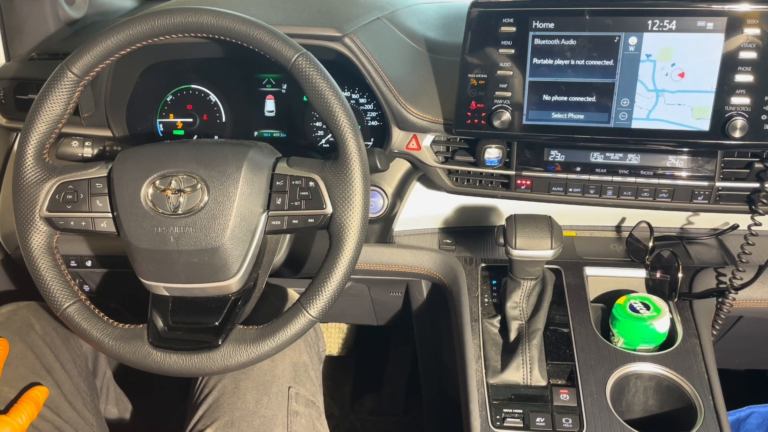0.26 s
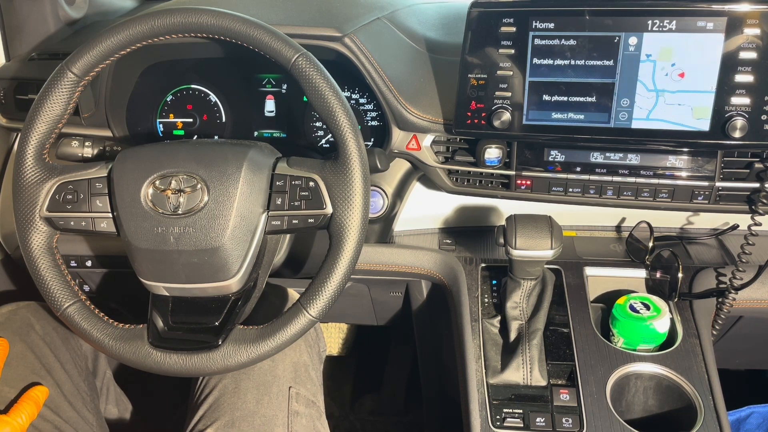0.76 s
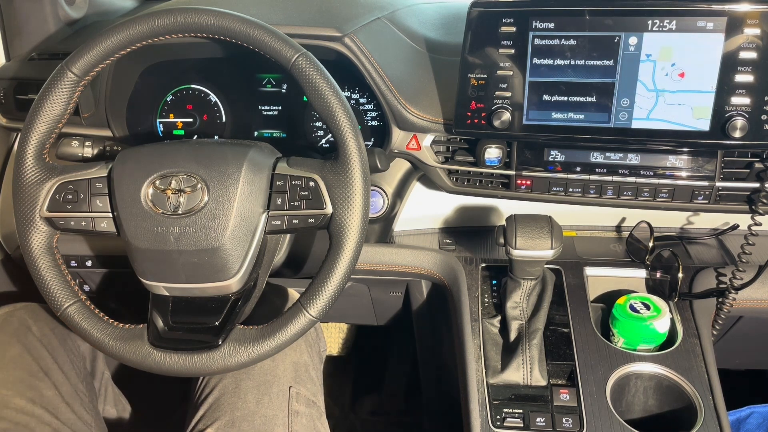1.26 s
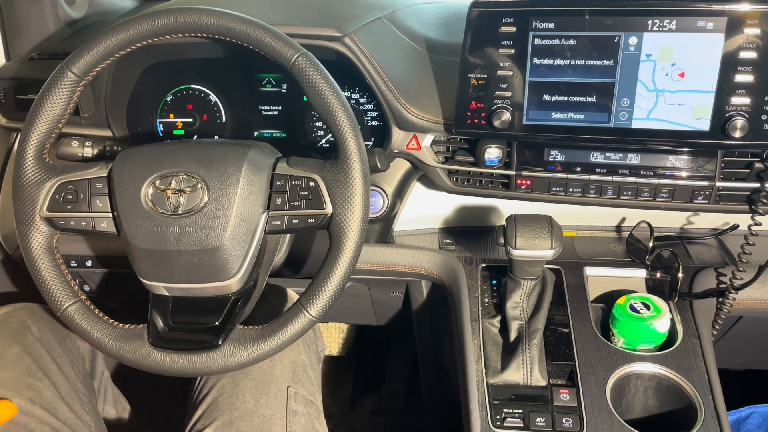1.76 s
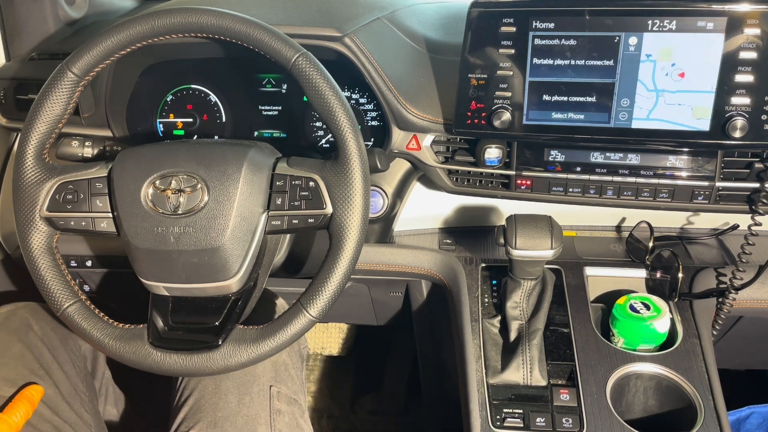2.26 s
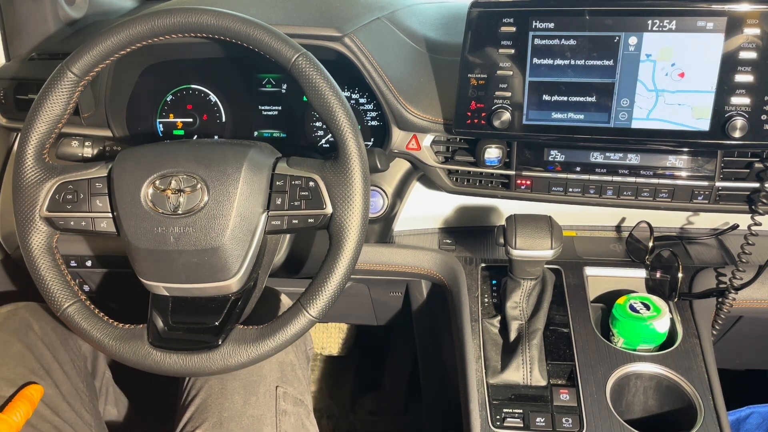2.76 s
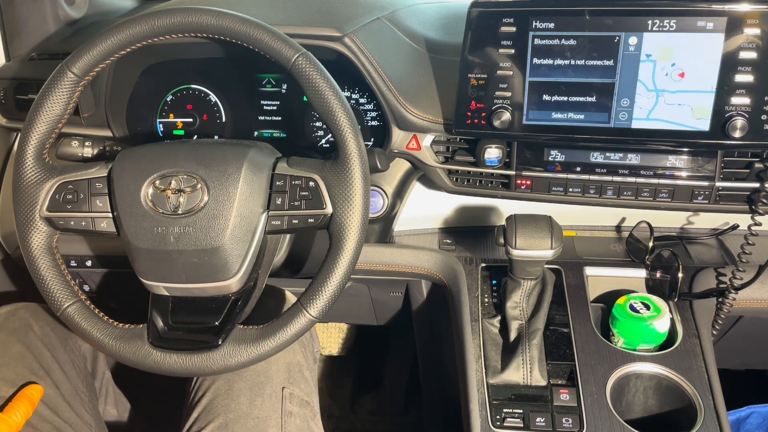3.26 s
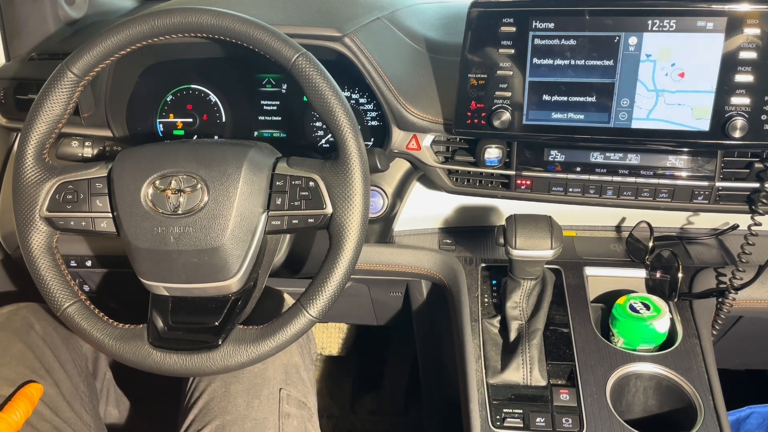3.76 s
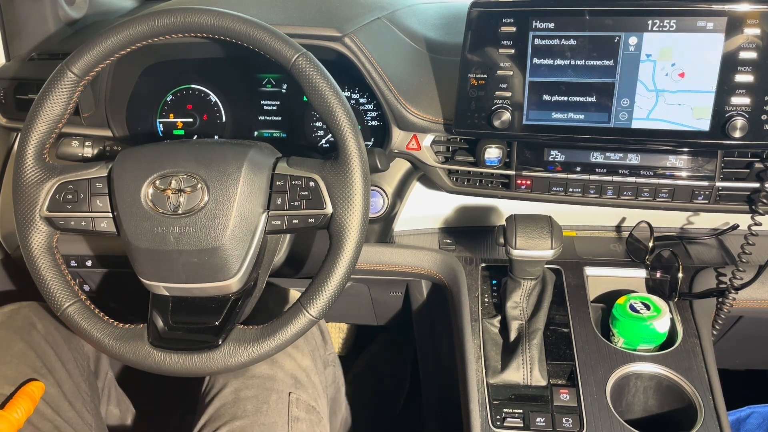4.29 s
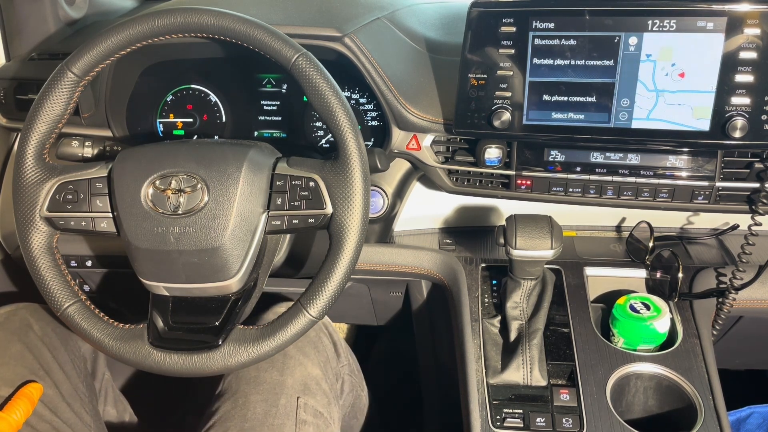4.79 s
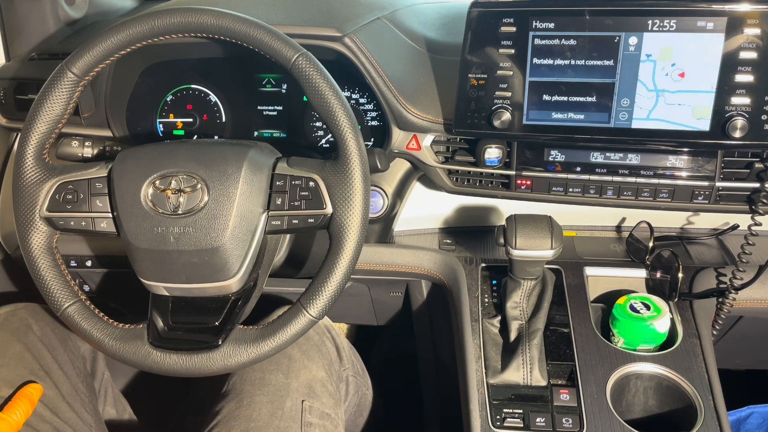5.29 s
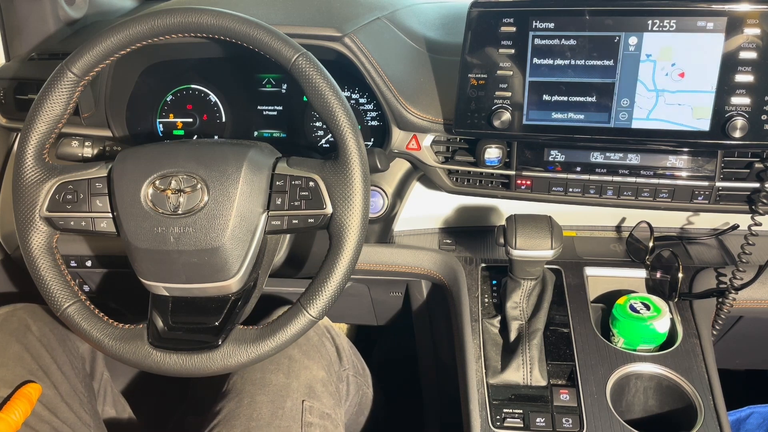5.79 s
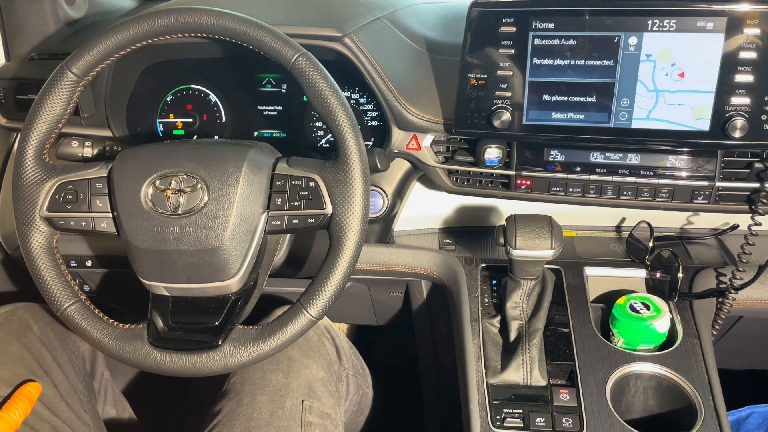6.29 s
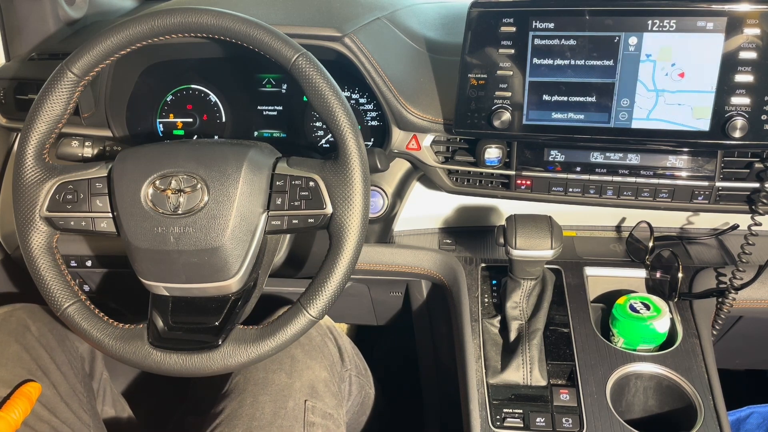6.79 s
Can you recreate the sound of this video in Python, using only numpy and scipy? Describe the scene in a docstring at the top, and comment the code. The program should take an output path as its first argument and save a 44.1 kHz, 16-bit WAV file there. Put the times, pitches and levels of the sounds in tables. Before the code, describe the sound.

Inside a parked car, a fast-idling engine hums unsteadily under blower hiss, then revs climb into a booming, roaring cabin drone.

```python
"""Inside a parked car: a four-cylinder engine idles fast, then is revved up until the cabin booms.
Engine and electric compressor are sums of shaft orders shaped by resonances; the compressor slows,
speeds up and settles. Blower hiss, floor rumble and engine-bay roar are filtered noise, as are
a brief high fizz and two soft footwell bumps. Two close microphone ports hear bass alike, treble apart."""
import sys
import numpy as np
from scipy import signal
from scipy.fft import rfft, irfft, next_fast_len
from scipy.io import wavfile
from scipy.ndimage import uniform_filter1d, map_coordinates

SR = 44100
rng = np.random.default_rng(int(sys.argv[2]) if len(sys.argv) > 2 else 0)


def wrap_up_sound(samples):
    """Save the sound to the file named by the first command line argument, as 16-bit audio."""
    columns = np.atleast_2d(samples).T
    # keep every value between -1 and 1, then stretch to whole-number steps
    tamed = np.clip(columns, -1, 1)
    steps = np.round(tamed * 32767).astype(np.int16)
    wavfile.write(sys.argv[1], SR, steps)


def decibels_to_gain(level_db):
    """Convert a level in decibels to a linear amplitude gain (20 dB per decade)."""
    exponent = np.asarray(level_db, float) / 20
    return 10 ** exponent


N = 310464

# engine firing rate, an unsteady idle and then a climb: (time [s], rate [Hz])
FIRING = [(0, 43.05), (.25, 43.38), (.5, 43.1), (.7, 43.1), (.82, 43.65), (1.2, 43.5), (1.4, 43.4),
          (1.56, 43.62), (1.75, 43.33), (2.08, 43.0), (2.2, 43.33), (2.55, 43.65), (2.75, 43.58),
          (3.08, 43.88), (3.2, 43.76), (3.38, 43.22), (3.8, 43.52), (4.0, 43.38), (4.25, 43.55),
          (4.45, 42.88), (4.6, 43.28), (4.9, 43.22), (5.0, 43.43), (5.32, 43.03), (5.42, 43.6), (5.6, 47.3),
          (5.7, 50.7), (5.9, 56.1), (6.0, 59.2), (6.1, 61.9), (6.3, 66.2), (6.5, 69.9), (6.7, 72.4),
          (7.04, 75.2)]
# between the ports: (frequency [Hz], noise side over mid [dB], likeness of side and mid [0-1],
# lead of side [rad])
PORTS = [(30, -15, 0.7, 2.5), (150, -7, 0.2, 4.5), (207, -9, 0.1, 1), (300, -2.5, 0.46, 1),
         (570, 2, 0.56, 0.4), (716, 4, 1, 0.67), (1300, 2, 0.28, 0.5), (1760, 3, 0.4, -1.5),
         (2210, -5, 0.3, 1), (4900, -2, 0.44, 0), (6540, -4.5, 0.15, -1.5), (8340, 5.5, 0, 1.5),
         (10100, -1.5, 0.4, 2), (11900, -11, .1, -16), (13500, 1, 0.3, 4), (14800, 8.5, 0.2, -4)]


def unit(x):
    """Scaled to rms 1."""
    return x / np.sqrt(np.mean(x ** 2))


def curves(rows):
    """One value per sample for each column after the time."""
    s, *cols = np.transpose(rows)
    return [np.interp(np.arange(N) / SR, s, c) for c in cols]


def along(points, hz):
    """Each column after the frequency, read on a log axis."""
    f, *cols = np.transpose(points)
    return [np.interp(np.log(hz + 1), np.log(f + 1), c) for c in cols]


def wobble(rate_hz):
    """A smooth random curve with rate_hz knots a second."""
    coarse = np.arange(0, N + 256, 256)
    knots = rng.standard_normal(int(N * rate_hz / SR) + 4)
    return np.interp(np.arange(N), coarse, map_coordinates(knots, [coarse * rate_hz / SR]))


def swell(start_s, rise_s, hold_s, fall_s):
    """Straight rise from 0 to 1, hold, and straight fall."""
    corners_s = start_s + np.cumsum([0, rise_s, hold_s, fall_s])
    return np.interp(np.arange(N) / SR, corners_s, [0, 1, 1, 0])


def filtered(x, response):
    """x times a complex response of frequency."""
    m = next_fast_len(N + 8192)
    return irfft(rfft(x, m) * response(np.fft.rfftfreq(m, 1 / SR)), m)[..., :N]


def modes(table, hz):
    """Summed power of resonances at a frequency."""
    return sum(decibels_to_gain(db) ** 2 / (1 + (2 * (hz - centre_hz) / width_hz) ** 2)
               for centre_hz, width_hz, db in table)


def through(table, hz):
    """Gain of resonances along a slowly gliding frequency."""
    coarse = np.arange(0, N, 128)
    return np.interp(np.arange(N), coarse, np.sqrt(modes(table, hz[coarse])))


def ripple(hz, spacing_hz):
    """Random ups and downs over frequency from the cabin's many echoes, clearest in the middle range."""
    knots = rng.standard_normal(int(SR / 2 / spacing_hz) + 4)
    depth = np.interp(hz, [300, 900, 3000, 7000], [0.2, 0.99, 1.0, 0.2])
    return map_coordinates(knots, [hz / spacing_hz]) * depth


def load():
    """0 at idle, rising to 1 as the throttle opens."""
    throttle_s, opening_s = 5.45, 0.1
    return np.clip((np.arange(N) / SR - throttle_s) / opening_s, 0, 1)


def tone(speed, order, db, sway_db, drift_rad, in_step=False):
    """One shaft order, unsteady in level and phase; in_step orders start together, as parts of one pulse."""
    turn_hz, turn_width_hz = 113, 12  # cabin mode about which the start phase turns
    if in_step:
        start = -np.arctan((order * speed - turn_hz) / turn_width_hz)
    else:
        start = 2 * np.pi * rng.random()
    phase = 2 * np.pi * order * np.cumsum(speed) / SR + start + drift_rad * wobble(7)
    return np.sqrt(2) * decibels_to_gain(db + sway_db * wobble(5)) * np.sin(phase)


def weak_tone(speed, order, db, sway_db, drift_rad, in_step=False):
    """A weak order comes forward where it crosses a body mode."""
    # body and cabin modes: (centre [Hz], width [Hz], gain [dB])
    body = [(44.3, 7.2, 6), (79, 23, -3.5), (195.5, 59, -0.5), (227, 13.6, 1), (255, 5.1, -4),
            (310, 17, -2), (352, 54, 3.5), (532, 37, 0), (597, 37, 4.5), (825, 40, 5), (970, 30, 0.5),
            (1140, 35, 7), (1270, 30.1, -7), (1350, 40, -5), (1450, 33, -1), (1640, 60, 0)]
    return through(body, order * speed) * tone(speed, order, db, sway_db, drift_rad, in_step)


def at_ports(x):
    """Mid and side of a source: side has a fixed level and phase against mid at each frequency."""
    def side(hz):
        side_db, _, lead_rad = along(PORTS, hz)
        return decibels_to_gain(side_db - 7.0) * np.exp(1j * lead_rad)
    return np.array([x, filtered(x, side)])


def diffuse(spectrum, gate, resonances):
    """Mid and side noise with a bump at every resonance, partly alike, mid at rms 1."""
    def response(hz):
        side_db, like, lead_rad = along(PORTS, hz)
        like = np.clip(like, 0, 1)
        colour = decibels_to_gain(along(spectrum, hz)[0]) * np.sqrt(1 + modes(resonances, hz))
        mid = colour * decibels_to_gain(1.9 * ripple(hz, spacing_hz=25))
        side = colour * decibels_to_gain(side_db + 2.0 * ripple(hz, spacing_hz=25))
        turn = np.exp(1j * (lead_rad + 0.62 * ripple(hz, spacing_hz=120)))
        return np.array([mid, side * like * turn, side * np.sqrt(1 - like ** 2)])
    a, b = gate * rng.standard_normal((2, N))
    mid, shared, own = filtered(np.array([a, a, b]), response)
    return np.array([mid, shared + own]) / np.sqrt(np.mean(mid ** 2))


def airflow():
    """Blower hiss, a lumpy floor-pan rumble, and engine-bay roar that throbs with each firing."""
    # noise spectra before resonances: (frequency [Hz], relative density [dB per Hz])
    blower_spectrum = [(150, -38), (260, -16.5), (450, -12), (700, -14.5), (1300, -22), (1700, -19),
                       (2300, -18.5), (3500, -23.5), (6500, -33), (10300, -37), (12200, -35.5),
                       (13700, -48)]
    rumble_spectrum = [(15, -35), (30, -9), (60, 0), (105, -2), (150, -3), (210, 0), (280, -11), (420, -20),
                       (600, -45), (1200, -120)]
    roar_spectrum = [(15, -31), (40, -36), (100, -10), (150, -10.5), (280, -4), (360, -2.5), (450, -9),
                     (700, -8.5), (1000, -13), (1800, -10), (2500, -10.5), (3500, -17.5), (6500, -27),
                     (10300, -36), (12200, -30), (13700, -48)]
    # dashboard and duct resonances: (centre [Hz], width [Hz], gain [dB])
    panels = [(542, 20, 6), (592, 19, 7.5), (830, 143, 3.5), (1140, 12.5, 5.5), (1534, 51, 0),
              (1765, 15, 6.5), (1900, 29, 1), (2307, 36, 6.5), (2665, 97, 2), (3640, 55, -0.5),
              (10370, 170, 4)]
    # bulkhead resonances, through which the engine bay is heard: (centre [Hz], width [Hz], gain [dB])
    bulkhead = [(540, 24, 6.5), (600, 30, 5.5), (855, 140, 3.5), (1140, 24, 7.5), (1550, 100, 2.5),
                (1760, 23, 1.5), (2323, 45, 8), (2680, 63, -2), (10370, 160, 9)]
    # blower hiss: (time [s], level [dB])
    hiss_level = [(0, -49), (.9, -49.5), (1.5, -49), (2.6, -48), (4.3, -48), (5.2, -48.5), (5.5, -48),
                  (5.9, -48.5), (7.04, -51)]
    # top treble of blower and roar: (time [s], gain [dB])
    treble_gain = [(0, -0.5), (5.3, -1), (5.42, -4), (5.6, -3.5), (5.9, -2.5), (6.2, -1), (7.04, 0)]
    rumble_db = -47.5
    roar_idle_db, roar_load_db, roar_db_per_hz = -54, 7.5, 0.145

    firing, = curves(FIRING)
    blower_db = curves(hiss_level)[0] + 0.41 * wobble(8)
    blower = decibels_to_gain(blower_db) * diffuse(blower_spectrum, 1, panels)
    lumps = decibels_to_gain(1.2 * wobble(4) + 1.2 * wobble(9))
    rumble = decibels_to_gain(rumble_db) * diffuse(rumble_spectrum, lumps, panels)

    turns = np.cumsum(firing) / SR  # firings so far
    # second term: one cylinder of four fires harder
    throb = decibels_to_gain(0.23 * np.cos(2 * np.pi * turns) + 0.51 * np.cos(np.pi * turns / 2))
    roar = diffuse(roar_spectrum, throb, bulkhead)
    bright = filtered(roar, lambda hz: hz ** 2 / (hz ** 2 + 1400 ** 2))
    # slower firing sounds duller, 0.2 dB per Hz
    roar = roar - bright + decibels_to_gain(0.2 * (firing - firing.max())) * bright
    roar_db = roar_idle_db + roar_load_db * load() + roar_db_per_hz * (firing - firing.min())
    air = blower + decibels_to_gain(roar_db + 0.46 * wobble(7.4)) * roar

    top = filtered(air, lambda hz: 1 / (1 + (6000 / (hz + 1)) ** 6))
    top_gain = decibels_to_gain(curves(treble_gain)[0] + 0.8 * wobble(6))
    return rumble + air + (top_gain - 1) * top


def fizz():
    """A narrow, high noise band that swells, holds and stops as the revs climb."""
    # (frequency [Hz], relative density [dB per Hz])
    fizz_spectrum = [(10700, -30), (11000, -2), (11500, 0), (12100, -2), (12500, -30)]
    shape = swell(start_s=6.27, rise_s=0.062, hold_s=0.26, fall_s=0.037)
    hiss = unit(filtered(rng.standard_normal(N), lambda hz: decibels_to_gain(along(fizz_spectrum, hz)[0])))
    return at_ports(shape * decibels_to_gain(-70 + 1.5 * wobble(20)) * hiss)


def bumps():
    """A shoe meets carpet and pedal: a dull, decaying noise puff, soft in its start."""
    # (time [s], level before onset and decay [dB], centre [Hz], width [Hz])
    footwell = [(4.02, -43, 320, 150), (5.5, -40, 195, 120)]
    decay_60db_s, onset_s = 0.77, 0.0028
    out, t = np.zeros(N), np.arange(N) / SR
    for start_s, db, centre_hz, width_hz in footwell:
        since = np.clip(t - start_s, 0, None)
        noise = rng.standard_normal(N)
        puff = unit(filtered(noise, lambda hz: modes([(centre_hz, width_hz, 0)], hz)))
        out += decibels_to_gain(db - 60 * since / decay_60db_s) * (1 - np.exp(-since / onset_s)) * puff
    return at_ports(out)


def compressor():
    """A hum of shaft orders gliding with speed; most fade as it slows, the weak ones swell as it speeds up."""
    # (time [s], shaft speed [Hz])
    shaft_speed = [(0, 28.93), (.6, 26.7), (.95, 25), (1.5, 22.4), (2, 24.38), (2.3, 25.6), (2.6, 26.15),
                   (3, 26.59), (3.5, 26.34), (4, 25.99), (4.5, 25.79), (7.04, 25.88)]
    # weak tones: (multiple of shaft speed, level at constant speed before body modes [dB])
    weak_orders = [(4, -53), (9, -56), (10, -71), (12, -66), (14, -65)]
    # modes that carry the 7th order: (centre [Hz], width [Hz], gain [dB])
    mount = [(153.1, 4.3, -17), (172, 5.4, -8), (182.9, 7.1, -1.5), (201.6, 7.5, 3)]
    seventh_db, fifth_idle_db, fifth_load_db = -42.5, -61.5, 14  # the 5th comes forward as the engine pulls
    pull_db_per_hz_s = 1
    coasting = 1.9  # extra fading of the 7th order while slowing

    speed, = curves(shaft_speed)
    speeding_up = uniform_filter1d(np.gradient(speed) * SR, SR // 5)  # Hz/s
    pull_db = np.clip(pull_db_per_hz_s * speeding_up, -12, 6)
    seventh_level = seventh_db + coasting * np.minimum(pull_db, 0)
    seventh = through(mount, 7 * speed) * tone(speed, 7, seventh_level, sway_db=0.7, drift_rad=0.1)
    fifth = tone(speed, 5, fifth_idle_db + fifth_load_db * load(), sway_db=2.5, drift_rad=0.2)
    weak = sum(weak_tone(speed, k, db + pull_db, sway_db=1.5, drift_rad=0.1) for k, db in weak_orders)
    return at_ports(seventh + fifth + weak)


def engine():
    """Firing orders boom on the cabin's low modes, the 19th sings on a dashboard mode, gears whine."""
    # booming tones before cabin gain: (multiple of firing rate, idle level [dB], load level [dB])
    main_orders = [(1, -34.5, -32.5), (2, -42.5, -32.5), (3, -37, -41)]
    # weak tones before body modes: (multiple of firing rate, idle level [dB], full-revs level [dB])
    minor_orders = [(.5, -67, -58), (.75, -67, -50), (1.5, -71, -49), (1.75, -51.5, -58), (2.51, -63, -52),
                    (3.53, -68, -49), (4, -50.5, -51), (4.496, -58, -59.5), (4.987, -63.5, -62),
                    (8.04, -71.5, -60.5), (8.29, -80, -57), (9.07, -68, -61), (9.63, -69, -62),
                    (11.1, -65, -62), (12, -62, -73), (13.15, -85, -60), (13.55, -83, -56.5),
                    (14.61, -64.5, -61.5), (17.5, -80, -62), (18.2, -73, -57), (19.2, -81, -60),
                    (22.6, -70, -60)]
    # cabin air modes lift or cancel a tone: (frequency [Hz], gain [dB])
    boom = [(40, -18), (44, -17.5), (47.5, -12), (51, -16.5), (56, -20), (59.5, -4), (62, -7.5),
            (64.3, -11), (66.5, -4), (70, -4.5), (72.5, 1), (76, -1.5), (87, -11.5), (94.5, -6.5),
            (101.5, -7), (107, -10), (112, 0), (118, -5.5), (128, -2), (132, -5.5), (137, -7), (143, -11),
            (152, -17), (160, -10), (172, -22), (185, -2.5), (194, 1), (208, -26), (220, -9), (240, -10)]
    # idling 3rd order wavers: (time [s], gain [dB])
    waver = [(0, -6), (.12, 0), (.4, -5), (.68, -2), (.9, -9), (1.1, -7.5), (1.35, -1), (1.68, -12.5),
             (1.92, -1.5), (2.15, -6), (2.45, 1), (2.8, -14), (3.38, 0), (3.6, -9), (4.02, -1.5),
             (4.28, -18), (4.5, -2), (4.65, -7), (4.95, 0.5), (5.15, -4.5), (5.35, 3), (5.46, -10)]
    # two lowest idling orders sag now and then: (time [s], gain [dB])
    sag = [(0, -4), (.6, 0), (.9, -8), (1.1, -2), (1.9, 3), (2.3, -3), (2.75, 1.5), (3.1, -2), (3.5, 2),
           (3.88, -9), (4.1, 0), (4.9, -0.5), (5.2, 1), (5.46, 4)]
    # trim resonances that pass the whine: (centre [Hz], width [Hz], gain [dB])
    trim = [(4785, 30, -5), (5190, 110, -1.5), (5390, 70, 2.5), (5535, 30, 2), (5690, 150, -2.5),
            (5880, 110, -1.5)]
    sing_idle_db, sing_load_db, sing_db_per_hz, idle_hz = -54.5, -13, 5, 43.35
    whine_order, whine_db = 87, -64

    firing, = curves(FIRING)
    pulling = load()
    revs = (firing - firing.min()) / np.ptp(firing)
    waver_db = (1 - pulling) * curves(waver)[0]
    sag_db = (1 - pulling) * curves(sag)[0]

    main = np.zeros(N)
    for k, idle_db, load_db in main_orders:
        db = idle_db + pulling * (load_db - idle_db) + (waver_db if k == 3 else sag_db)
        cabin_gain = decibels_to_gain(along(boom, k * firing)[0])
        main += cabin_gain * tone(firing, k, db, sway_db=0.97, drift_rad=0.17, in_step=True)

    sing_db = sing_idle_db + sing_load_db * pulling
    sing_db = sing_db + sing_db_per_hz * np.clip(firing - idle_hz, -1, 0.5)
    sing = through([(825, 40, 0)], 19 * firing) * tone(firing, 19, sing_db, sway_db=1.0, drift_rad=0.08)

    minor = np.zeros(N)
    for k, idle_db, full_db in minor_orders:
        db = idle_db + revs * (full_db - idle_db)
        minor += weak_tone(firing, k, db, sway_db=2, drift_rad=0.14, in_step=True)

    # gear whine while the revs climb; it flutters in pitch and level
    shape = swell(start_s=5.82, rise_s=0.03, hold_s=0.56, fall_s=0.02)
    shape = shape * through(trim, whine_order * firing)
    gear_speed = firing * (1 + 0.003 * wobble(45))
    flutter_db = 1.5 * np.tanh(wobble(35))
    whine = shape * tone(gear_speed, whine_order, whine_db + flutter_db, sway_db=1, drift_rad=1)
    return at_ports(main + sing + minor + whine)


def scene():
    """Everything as mid and side, then left and right."""
    mid, side = airflow() + fizz() + bumps() + compressor() + engine()
    return np.array([mid + side, mid - side])


def low_pass(x):
    """Removes everything above the highest recorded frequency."""
    return signal.sosfilt(signal.butter(12, 15720, fs=SR, output="sos"), x)


def record(dry):
    """Mid and side each have one treble band cut by 25 dB and lose all above their own limit."""
    def band_limit(hz, gap_hz, top_hz):
        in_gap = (hz > gap_hz[0]) & (hz < gap_hz[1])
        return (hz < top_hz) * np.where(in_gap, decibels_to_gain(-25), 1)

    def response(hz):
        mid = band_limit(hz, gap_hz=(7600, 8900), top_hz=13750)
        side = band_limit(hz, gap_hz=(10800, 12450), top_hz=15720)
        return np.array([mid, side])
    pair = np.array([dry[0] + dry[1], dry[0] - dry[1]]) / 2
    mid, side = filtered(pair, response)
    return low_pass(np.array([mid + side, mid - side]))


dry = scene()
out = record(dry)
wrap_up_sound(out)
```